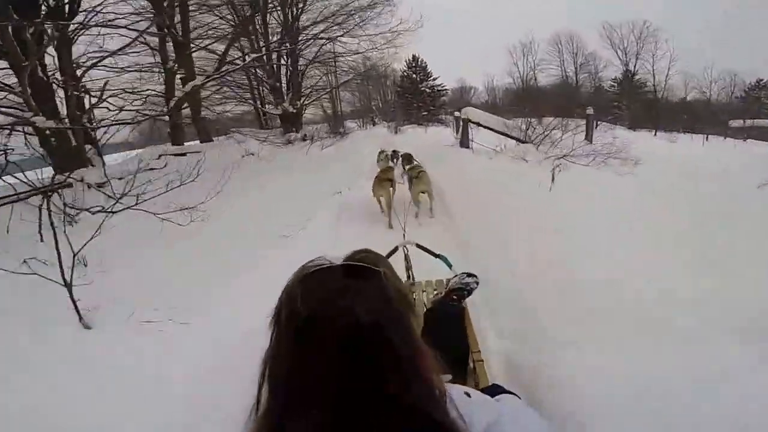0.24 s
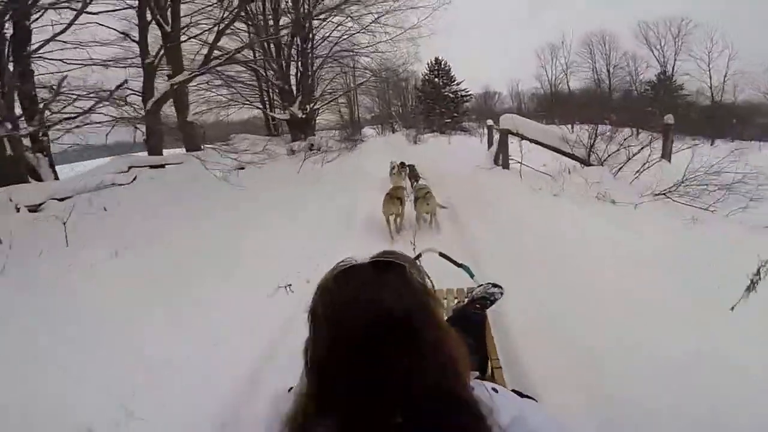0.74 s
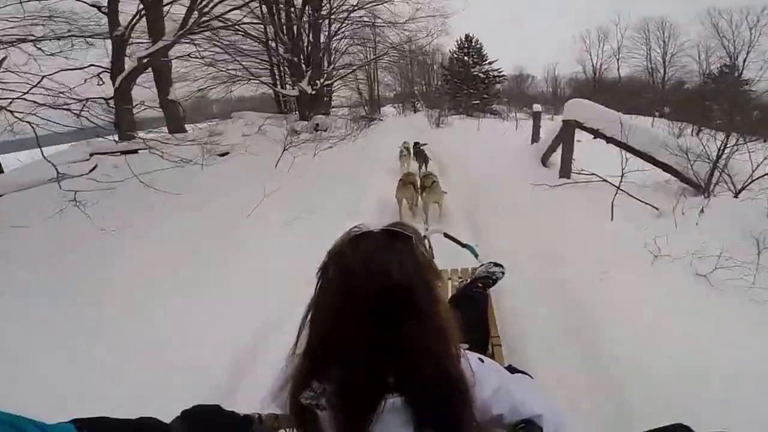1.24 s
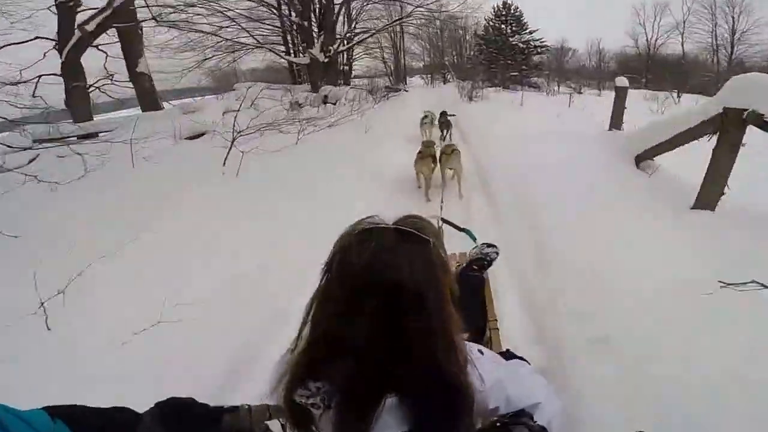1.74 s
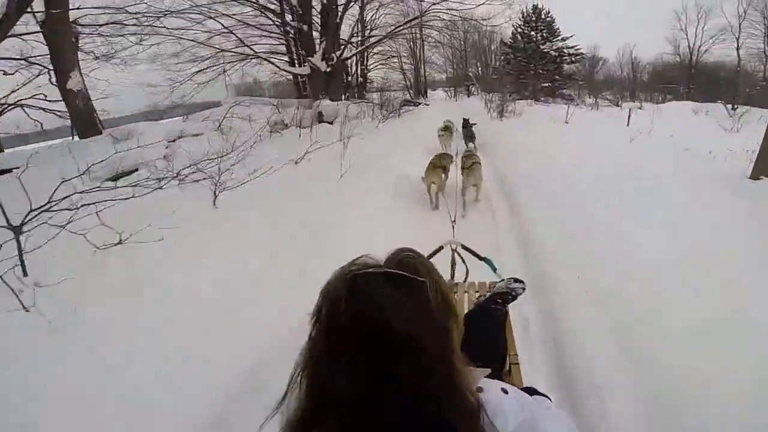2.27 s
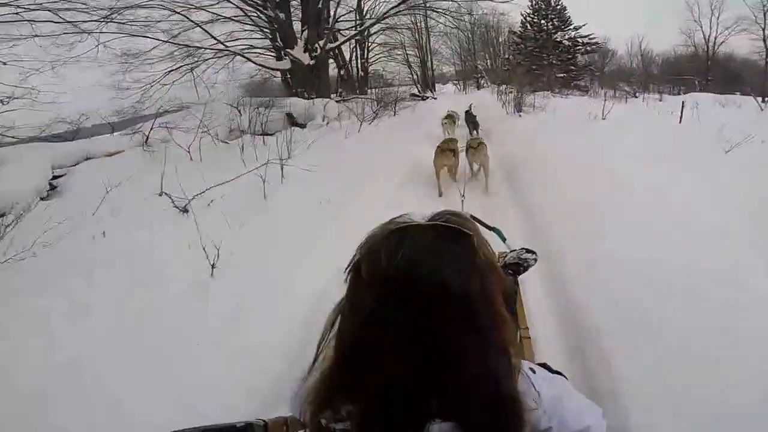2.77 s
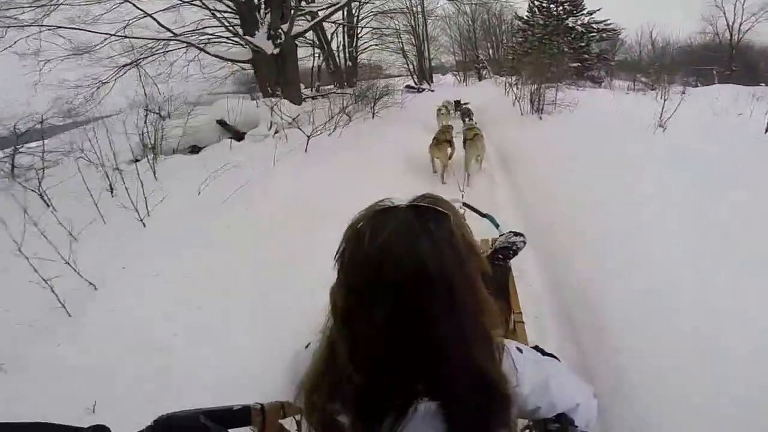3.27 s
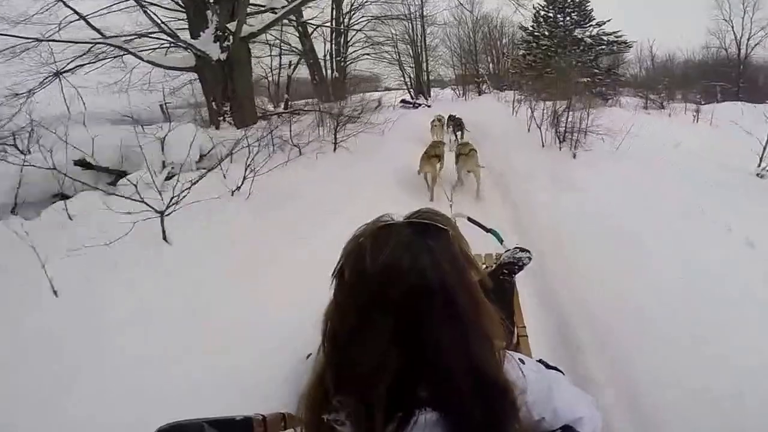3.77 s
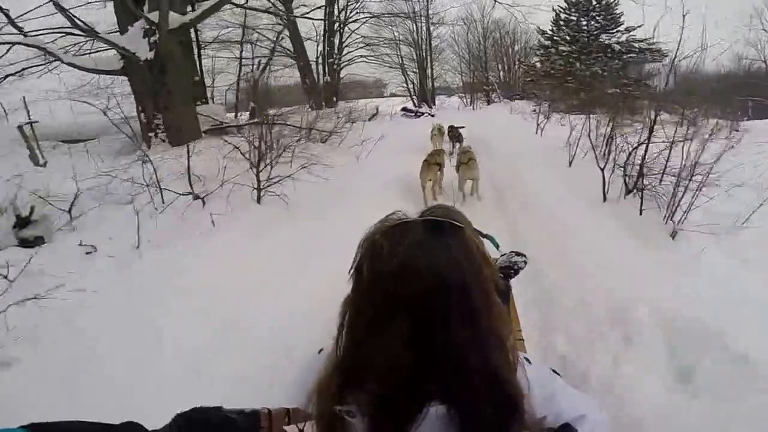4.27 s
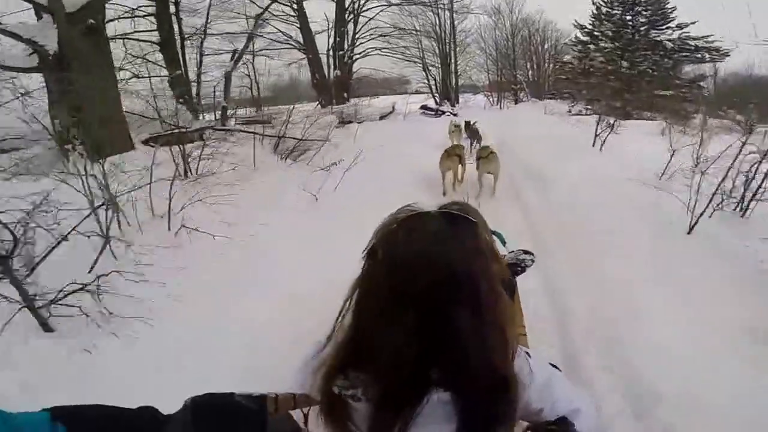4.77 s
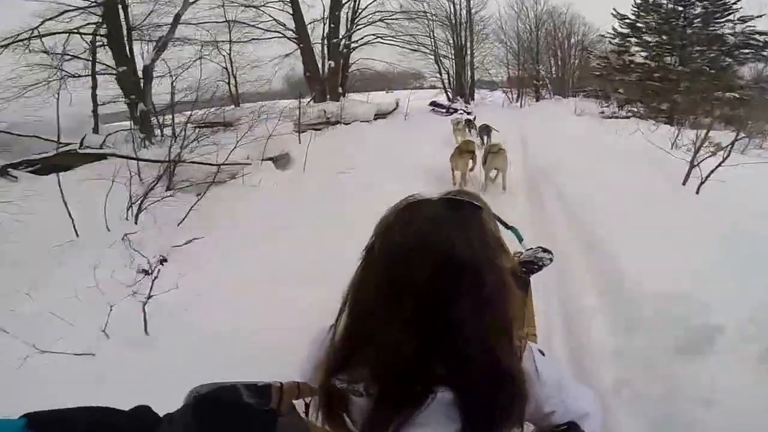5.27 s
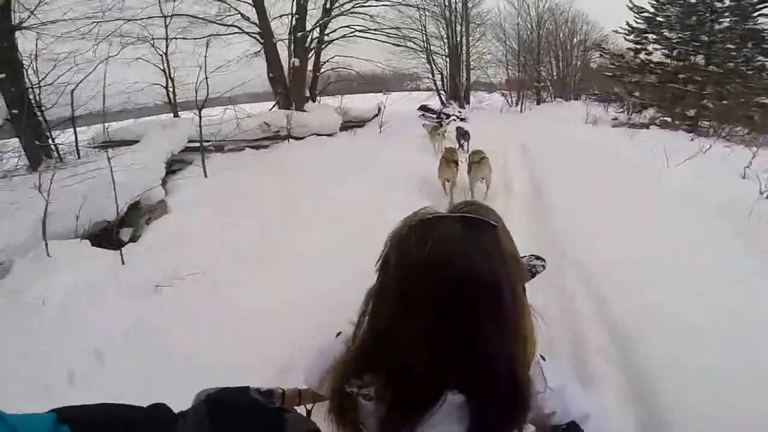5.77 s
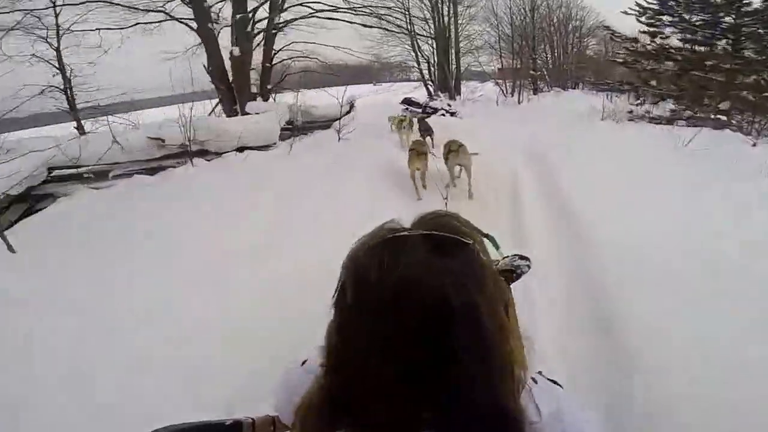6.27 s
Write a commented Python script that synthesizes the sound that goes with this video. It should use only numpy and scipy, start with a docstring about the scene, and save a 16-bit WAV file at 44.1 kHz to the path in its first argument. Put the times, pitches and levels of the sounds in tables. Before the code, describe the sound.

A sled moves steadily over packed snow for about six and a half seconds, heard close and slightly boxy through a small camera case, in open air without echo. Grainy hiss, icy ticking and low rumble run throughout. From 0.5 to 2.6 s the runners bite in short gritty scrapes, strongest around 1 to 1.4 s; afterwards the glide is lighter, with scrapes returning near 6 to 6.4 s. Crust snaps sharply around 0.8 to 1.0, 2.1, 4.1 to 4.3 and 5.1 to 5.5 s. Deep soft jolts land about every half second. Damped wooden knocks come near 0.3, 0.8, 1.1 to 1.3, 2.4, 4.0, 4.3 to 4.6, 5.7 and 6.3 s. Tiny metal clinks appear around 2.8 to 3.9 s, brief snow squeaks at 2.9 s and mostly after 5.2 s. Low wind puffs swell near 2 and 5.5 s, over very faint electronic hiss and thin buzz.

```python
"""Dog sled on a snowy trail

A sled ride heard from a small cased camera worn by the driver. Filtered grains of noise make the runners'
scrape, hiss and rumble; bursts of noise and rings make crunches and crackle; chirps make squeaks and clinks rattle.
Low swept sines jolt the ride about twice a second and knock the frame. Wind is low noise in uneven puffs.
The case's resonances colour most of the snow, wood and wind; the electronics hiss and buzz very faintly.
"""
import sys
import numpy as np
from scipy import signal
from scipy.fft import rfft, irfft, next_fast_len
from scipy.io import wavfile
from scipy.ndimage import uniform_filter1d

SR = 44100
rng = np.random.default_rng(int(sys.argv[2]) if len(sys.argv) > 2 else 0)


def store_pcm(level_fs):
    """Save levels as 16-bit WAV."""
    pcm = np.round(np.clip(level_fs, -1, 1) * 32767).astype(np.int16)
    wavfile.write(sys.argv[1], SR, np.atleast_2d(pcm).T)


N = 287487
TIME = np.arange(N) / SR

# Runners biting into packed snow. Each row: start in seconds, length in seconds, scrape level in dB
# before the takeover from the hiss, sag over the length in dB, rumble level in dB.
RUNNER_BITES = [(0.471, 0.16, -44.5, 9, -47.5), (0.933, 0.078, -49, -0.5, -47),
                (1.015, 0.15, -43, 8.5, -40.5), (1.257, 0.039, -43, -0.5, -43),
                (1.329, 0.096, -44.5, 8, -38), (1.408, 0.23, -49.5, 6, -51), (1.807, 0.11, -50.5, -1, -50),
                (1.868, 0.17, -44.5, 0, -44.5), (2.358, 0.047, -49, -0.5, -45.5),
                (2.407, 0.17, -44, 3, -43), (3.374, 0.06, -53, 2, -67), (5.083, 0.12, -51.5, 1, -58),
                (6.032, 0.093, -45, 12, -50), (6.255, 0.045, -49, 0.5, -52), (6.356, 0.21, -53, -1.5, -53)]
BITE_ATTACK_S, BITE_RELEASE_S = 0.032, 0.037
# Light, steady scrape between bites. Each row: time in seconds, level in dB before the takeover.
LIGHT_SCRAPE_LEVEL = [(0, -57), (0.8, -55.5), (1.6, -56), (1.77, -58), (2.2, -55.5), (2.32, -58.5),
                      (2.7, -56), (3.75, -58), (3.96, -55), (4.2, -59.5), (4.58, -53.5), (4.94, -60.5),
                      (5.05, -54), (5.3, -60.5), (5.65, -56.5), (5.82, -59.5), (6.0, -52.5), (6.52, -55)]
# Loose, icy snow. Each row: time in seconds, reference level in dB that hiss and crackle are offset from.
LOOSE_SNOW_LEVEL = [(0, -56.5), (0.2, -57), (0.4, -59), (0.75, -56.5), (0.96, -55), (1.15, -56.5),
                    (1.55, -54.5), (1.77, -60), (1.93, -53.5), (2.35, -58), (2.8, -59), (3.8, -60.5),
                    (4.22, -57.5), (4.95, -59), (5.2, -57.5), (5.5, -58.5), (5.8, -61), (6.52, -55.5)]
# The trail's rumble in the frame. Each row: time in seconds, level in dB.
TRAIL_RUMBLE_LEVEL = [(0, -55), (0.7, -53), (0.9, -47), (1.25, -55.5), (1.75, -54.5), (2.3, -56),
                      (2.68, -53), (3.0, -54.5), (3.4, -52.5), (3.72, -59.5), (4.02, -51), (4.5, -57.5),
                      (5.02, -52.5), (5.42, -52), (5.75, -55.5), (6.2, -50), (6.52, -51)]
# Resonances of the runners. Each row: pitch in Hz, quality factor, gain in dB.
RUNNER_RESONANCES = [(1136, 8.4, -5), (1360, 5.9, -10.5), (1700, 12, -10.5), (2256, 30, 3)]

# Larger pieces of crust breaking. Each row: time of the snap in seconds, peak level in dB, ring-out in seconds,
# ring pitch in Hz, relative crispness in dB.
CRUST_BREAKS = [(0.03, -41.5, 0.024, 1580, -12), (0.108, -38.5, 0.035, 2910, -26),
                (0.134, -36, 0.033, 2730, -26), (0.288, -36.5, 0.038, 2570, -16),
                (0.342, -37, 0.013, 2570, -15), (0.445, -39.5, 0.027, 2230, -14),
                (0.785, -33.5, 0.048, 2810, -18), (0.799, -38.5, 0.023, 1810, -6),
                (0.841, -40, 0.056, 2690, -23), (0.892, -30, 0.063, 3130, -17),
                (1.035, -32, 0.046, 1410, -42), (2.14, -32, 0.027, 2660, -18),
                (2.226, -39, 0.033, 2660, -17), (2.955, -42.5, 0.03, 3490, -23),
                (3.828, -37.5, 0.022, 2240, -9), (4.034, -42.5, 0.027, 2010, -3),
                (4.104, -43.5, 0.09, 4440, -16), (4.12, -38, 0.027, 2290, -12),
                (4.185, -35.5, 0.047, 2750, -15), (4.288, -38, 0.04, 2060, -13),
                (4.318, -38.5, 0.019, 2800, -12), (4.717, -38.5, 0.033, 2900, -19),
                (4.741, -37, 0.028, 2870, -15), (4.872, -38.5, 0.018, 2340, -7.5),
                (5.181, -36, 0.06, 2920, -18), (5.198, -32, 0.03, 3020, -18),
                (5.255, -38, 0.043, 2980, -31), (5.349, -40, 0.025, 2220, -10),
                (5.484, -41, 0.15, 3600, -24), (5.502, -41, 0.058, 2800, -20),
                (5.541, -35, 0.07, 3050, -35), (5.91, -38, 0.027, 2360, -41), (6.244, -40, 0.018, 2700, -4),
                (6.365, -34, 0.021, 2780, -32)]
# Stretches where small pieces break at random. Each row: start in seconds, end in seconds,
# middle of the peak levels in dB.
CRUSTY_STRETCHES = [(0.117, 0.258, -41.5), (0.861, 1.0, -41), (4.101, 4.3, -43.5), (5.101, 5.55, -43)]
CRUMBS_PER_S, CRUMB_SCATTER_DB, CRUMB_T60_S = 34, 3, 0.038
CRUMB_CENTRE_HZ, CRUMB_CRISP_DB = 3120, -21
# Cold snow squeaking under the runners. Each row: start in seconds, relative level in dB,
# middle pitch in Hz, length in seconds.
SNOW_SQUEAKS = [(2.949, -40, 3540, 0.019), (4.263, -46, 6050, 0.026), (5.243, -38, 3280, 0.022),
                (5.413, -43, 3600, 0.042), (5.432, -37, 3700, 0.12), (5.49, -38, 4600, 0.034),
                (6.352, -34, 2880, 0.019)]

# Bounces of the ride. Each row: start in seconds, peak level in dB, pitch in Hz that the swing settles to.
RIDE_JOLTS = [(0.021, -31, 35.6), (0.504, -27.5, 33.5), (1.083, -30.5, 76), (1.525, -29.5, 32),
              (1.999, -30, 102.4), (2.553, -28.5, 33), (3.07, -28, 34.5), (3.581, -32, 45.6),
              (4.102, -33, 66), (4.619, -28.5, 66), (5.137, -28, 41), (5.654, -28.5, 34.4),
              (5.894, -34.5, 35.0), (6.17, -27.5, 33.6)]
# Knocks of the wooden frame. Each row: start in seconds, thud peak level in dB, nominal thud pitch in Hz,
# relative clack level in dB, clack pitch in Hz.
FRAME_KNOCKS = [(0.294, -37.5, 171, -13, 1430), (0.765, -38, 139, -14, 694), (1.141, -30.5, 148, -15, 1170),
                (1.328, -30, 142, -10, 633), (1.343, -38, 139, -8, 1440), (1.743, -43.5, 146, -2, 694),
                (2.367, -32.5, 143, -26, 1470), (3.982, -36, 145, -4.5, 1230), (3.995, -34, 146, -11, 790),
                (4.331, -27.5, 138, -22, 1290), (4.372, -33.5, 139, -14, 1370), (4.6, -31, 131, -30, 1430),
                (5.692, -30.5, 150, -9.5, 1130), (6.335, -36, 154, -15, 1500)]
# Tiny clinks of a harness snap. Each row: start in seconds, peak level in dB.
HARNESS_CLINKS = [(2.811, -55), (3.433, -50), (3.518, -50), (3.854, -57)]
# Resonances of that snap. Each row: pitch in Hz, relative level in dB.
SNAP_RESONANCES = [(5900, 3), (12500, -5)]

# Air on the case. Each row: time in seconds, level in dB around which it sways.
WIND_LEVEL = [(0, -46.5), (0.9, -46.5), (2.05, -42.5), (2.9, -48), (3.8, -49), (4.4, -47.5), (4.8, -45.5),
              (5.5, -41.5), (5.95, -47.5), (6.52, -43.5)]
# Slow unevenness, then the puff after each jolt: dB against the jolt, and its delay and half length.
WIND_SWAY_DB, PUFF_DB, PUFF_S = 2, -14, 0.038

# Spectra of the layers before the case colours them. Each row: frequency in Hz, relative level in dB.
SCRAPE_SPECTRUM = [(300, -10), (700, -13), (900, -9), (1100, -2.5), (1600, -1), (2400, 1), (3000, -7),
                   (4000, -11.5), (6500, -18), (10000, -26.5), (15000, -40)]
HISS_SPECTRUM = [(200, -5.5), (450, -1.5), (800, -6), (1400, -6.5), (2400, -3), (3400, -5), (4500, -11),
                 (6200, -11), (8000, -15), (10500, -22.5), (12000, -29), (15000, -50)]
RUMBLE_SPECTRUM = [(40, -17), (95, 2.5), (140, 0.5), (250, -6.5), (350, -11), (480, -21.5), (800, -31),
                   (2000, -80), (8000, -100)]
CRUST_SPECTRUM = [(200, 4.5), (1000, -14.5), (1350, 2), (2900, 4.5), (4500, -4.5), (6200, -7.5),
                  (8000, -18), (11000, -27.5), (15000, -79)]
CLACK_SPECTRUM = [(200, 4), (500, -7), (800, -16), (1200, 0), (1900, -7), (3200, -6), (8000, -64)]
WIND_SPECTRUM = [(8, -8), (20, 1.5), (32, 4), (55, -4.5), (100, -13.5), (180, -23.5), (400, -81),
                 (3000, -110)]

# Resonances and notches of the camera case. Each row: centre in Hz, width in Hz, gain in dB.
CASE_RESONANCES = [(1195, 220, -2.5), (1690, 540, 1), (2220, 450, -1.5), (2115, 34, 2.5), (3640, 580, 2),
                   (3920, 360, -6), (4540, 380, 3), (5145, 210, -9.5), (5500, 470, 1.5), (6710, 550, -4.5),
                   (6980, 460, 0), (8170, 1340, -4.5)]
# Long bursts of the electronics' buzz. Each row: start in seconds, end in seconds.
BUZZ_BURSTS = [(0, .19), (2.0, 2.28), (4.18, 4.48), (6.29, 6.52)]
# Tones of the buzz. Each row: frequency in Hz, relative level in dB.
BUZZ_TONES = [(9360, 0), (9920, -5), (10070, 0), (10350, -6), (10630, -1), (10950, -6)]
TOP_HZ = 15250


def undb(db):
    """Decibels to gain."""
    return 10 ** (np.asarray(db) / 20)


def unit(x):
    """Scale to rms 1."""
    return x / np.sqrt(np.mean(x ** 2))


def curve(table, axis):
    """One column of a table, joined by straight lines in time."""
    rows = np.array(table)
    return np.interp(TIME, rows[:, 0], rows[:, axis])


def colour(x, points):
    """Minimum-phase filter: a drawn spectrum plus the case's resonances, with no sound ahead of its cause."""
    size = next_fast_len(len(x) + 4096)
    size += size % 2
    hz = np.arange(size // 2 + 1) * SR / size
    rows = np.array(points)
    db = np.interp(np.log(hz + 1), np.log(rows[:, 0]), rows[:, 1])
    for centre, width, gain in CASE_RESONANCES:
        db = db + gain * np.exp(-2 * ((hz - centre) / width) ** 2)
    # folding the cepstrum onto positive time makes the filter causal
    cepstrum = irfft(np.log(undb(db)))
    cepstrum[1:size // 2] *= 2
    cepstrum[size // 2 + 1:] = 0
    response = np.exp(rfft(cepstrum))
    return irfft(rfft(x, size) * response)[:len(x)]


def walk(rate):
    """Slow chance: random levels, `rate` a second, joined by straight lines and scaled to rms 1."""
    knots = rng.standard_normal(4096)
    return unit(np.interp(TIME * rate, np.arange(len(knots)), knots))


def grains(rate, spread_db):
    """Snow crystals snapping: random clicks, about `rate` a second, of uneven size."""
    size = undb(spread_db * np.minimum(rng.exponential(size=N), 5))
    clicks = rng.random(N) < rate / SR
    return unit(clicks * rng.choice([-1, 1], N) * size)


def fade(t, rise, t60):
    """A soft attack and an exponential decay that falls 60 dB in t60 seconds."""
    return (1 - np.exp(-t / rise)) * np.exp(-np.log(1000) * t / t60)


def ring(x, hz, q):
    """One damped resonance."""
    return signal.lfilter(*signal.iirpeak(hz, max(q, 1), fs=SR), x)


def sweep(pitch):
    """A sine that follows a moving pitch in Hz."""
    return np.sin(2 * np.pi * np.cumsum(pitch) / SR)


def add(out, start, sound, db):
    """Mix in a sound with its peak at the given level."""
    i = max(int(start * SR), 0)
    part = sound[:N - i]
    out[i:i + len(part)] += undb(db) * part / np.abs(sound).max()


def runners():
    """Packed snow shears in gritty grains that ring the runners; loose snow hisses; the trail rumbles the frame."""
    shear = colour(grains(rate=3500, spread_db=2.2), SCRAPE_SPECTRUM)
    shear = shear + sum(undb(db) * ring(shear, hz, q) for hz, q, db in RUNNER_RESONANCES)
    scrape = unit(shear) * undb(1.06 * walk(rate=100) + 1.57 * walk(rate=20))

    hiss = unit(colour(grains(rate=9000, spread_db=1.5), HISS_SPECTRUM))
    hiss = hiss * undb(1.0 * walk(rate=41) + 1.6 * walk(rate=16))

    rumble = unit(colour(grains(rate=400, spread_db=1.5), RUMBLE_SPECTRUM))
    rumble = rumble * undb(0.61 * walk(rate=67) + 2.1 * walk(rate=8.8))

    bite_scrape, bite_rumble = bites()
    scrape_gain = np.hypot(bite_scrape, undb(curve(LIGHT_SCRAPE_LEVEL, axis=1)))
    rumble_gain = np.hypot(bite_rumble, undb(curve(TRAIL_RUMBLE_LEVEL, axis=1)))
    # the scrape takes over from the hiss when the runners bite
    takeover = 1 / (1 + np.exp(-(20 * np.log10(scrape_gain) + 59) / 3.1))
    hiss_db = curve(LOOSE_SNOW_LEVEL, axis=1) + 2 - 3 * takeover
    return scrape * takeover * scrape_gain + hiss * undb(hiss_db) + rumble * rumble_gain


def bites():
    """Gains of scrape and rumble: each bite swells, sags or builds as the snow gives, and lets go."""
    scrape, rumble = np.zeros(N), np.zeros(N)
    for start, length, scrape_db, sag_db, rumble_db in RUNNER_BITES:
        t = TIME - start
        swell = np.clip(t / BITE_ATTACK_S, 0, 1)
        release = np.exp(-np.maximum(t - length, 0) / BITE_RELEASE_S)
        shape = swell * release * undb(-sag_db * np.clip(t / length, 0, 1))
        scrape = np.hypot(scrape, shape * undb(scrape_db))
        rumble = np.hypot(rumble, shape * undb(rumble_db))
    return scrape, rumble


def crackle():
    """Small ice crumbs tick on the sled, each size ringing at its own pitch, louder with the loose snow."""
    ticks = 0
    for hz in np.geomspace(1400, 7500, num=12):
        ticks = ticks + unit(ring(grains(rate=22, spread_db=-2.0), hz, q=17))
    return unit(colour(ticks, CRUST_SPECTRUM)) * undb(curve(LOOSE_SNOW_LEVEL, axis=1) - 5.0)


def crunches():
    """Each piece of crust strains, snaps, and crumbles in a cluster of cracks that rings at its own pitch."""
    out, t = np.zeros(N), TIME[:SR // 8]
    lead = .012  # seconds of straining ahead of the listed time
    since = t - lead - .0015
    strain = np.exp(np.minimum(since, 0) / 0.0021)
    highpass = signal.butter(2, 4500, "high", fs=SR, output="sos")
    for start, db, t60, hz, crisp_db in CRUST_BREAKS + crumbs():
        release = np.exp(-np.log(1000) * np.maximum(since, 0) / max(t60, .005))
        grit = rng.standard_normal(len(t)) * rng.exponential(size=len(t)) ** .5
        cracks = colour(grit * strain * release, CRUST_SPECTRUM)
        body = 1.33 * unit(cracks) + 0.54 * unit(ring(cracks, hz, q=11.0))
        edge = undb(crisp_db + 10) * unit(signal.sosfilt(highpass, cracks))
        add(out, start - lead, body + edge, db)
    return out


def crumbs():
    """Small pieces break at random moments along the crusty stretches, each with its own strength and pitch."""
    rows = []
    for start, end, db in CRUSTY_STRETCHES:
        chance = rng.uniform(-1, 1, size=(64, 3))
        for place, strength, pitch in chance[:int((end - start) * CRUMBS_PER_S)]:
            moment = start + .5 * (1 + place) * (end - start)
            peak_db = db + CRUMB_SCATTER_DB * strength
            hz = CRUMB_CENTRE_HZ * 2 ** (0.35 * pitch)
            rows.append((moment, peak_db, CRUMB_T60_S, hz, CRUMB_CRISP_DB))
    return rows


def squeaks():
    """Crystals stick and slip for a moment in a rough, wavering chirp."""
    out = np.zeros(N)
    for start, db, hz, length in SNOW_SQUEAKS:
        size = int(length * SR)
        pitch = hz * (1 + 0.049 * walk(rate=1100)[:size])
        roughness = undb(5.2 * walk(rate=500)[:size])
        add(out, start, sweep(pitch) * np.hanning(size) * roughness, db - 8)
    return out


def jolts():
    """Each bounce shoves the camera sharply, then it swings on more slowly for a few low cycles."""
    out, t = np.zeros(N), TIME[:SR // 4]
    for start, db, hz in RIDE_JOLTS:
        pitch = hz + 55 * np.exp(-t / 0.0048)
        add(out, start, sweep(pitch) * fade(t, rise=0.0027, t60=0.15), db)
    return out


def knocks():
    """The lashed frame takes a bump: a heavily damped thud, a hollow body note and a dry wooden clack."""
    out, t = np.zeros(N), TIME[:SR // 8]
    for start, db, hz, clack_db, clack_hz in FRAME_KNOCKS:
        # the pitch sags as the lashings give
        pitch = hz * (0.64 + 0.9 * np.exp(-t / 0.0058))
        push = fade(t, rise=0.0043, t60=0.039) ** 2
        add(out, start, sweep(pitch) * push, db)
        clack = colour(rng.standard_normal(len(t)) * fade(t, rise=0.0017, t60=0.051), CLACK_SPECTRUM)
        note = unit(ring(clack, clack_hz, q=4))
        hollow = unit(ring(clack, hz=410, q=2.5))
        add(out, start, 1.3 * unit(clack) + note + hollow, db + clack_db + 2.5)
    return out


def clinks():
    """A small metal snap on the harness rattles briefly: a noise burst rings its resonances."""
    out, t = np.zeros(N), TIME[:SR // 10]
    for start, db in HARNESS_CLINKS:
        rattle = rng.standard_normal(len(t)) * fade(t, rise=.004, t60=0.025)
        metal = sum(undb(mode_db) * unit(ring(rattle, hz, q=18)) for hz, mode_db in SNAP_RESONANCES)
        add(out, start, metal, db)
    return out


def wind():
    """Eddies press on the case in low, uneven puffs, harder whenever a jolt throws the camera forward."""
    eddies = unit(colour(rng.standard_normal(N), WIND_SPECTRUM))
    puffs = np.zeros(N)
    for start, db, _ in RIDE_JOLTS:
        puffs += undb(db + PUFF_DB) * np.exp(-.5 * ((TIME - start - PUFF_S) / PUFF_S) ** 2)
    steady = undb(curve(WIND_LEVEL, axis=1) + WIND_SWAY_DB * walk(rate=14))
    return eddies * np.hypot(steady, puffs)


def electronics():
    """Faint circuit hiss; a thin buzz pulses about seven times a second, with long holds ending in a tiny whistle."""
    gate = .8 * ((TIME - .06) % .137 < .035)
    whistle_gate = np.zeros(N)
    for start, end in BUZZ_BURSTS:
        gate[(TIME > start) & (TIME < end)] = 1
        whistle_gate += (TIME > end) & (TIME < end + .04)
    # wandering phases roughen the tones
    buzz = sum(undb(db) * np.sin(2 * np.pi * hz * TIME + 1.4 * walk(rate=350)) for hz, db in BUZZ_TONES)
    tone = np.sin(2 * np.pi * 10230 * TIME + .5 * walk(rate=300))
    # short averages soften the switching
    whine = undb(-73.5) * unit(buzz) * uniform_filter1d(gate, size=200)
    whine += undb(-64.5) * tone * uniform_filter1d(whistle_gate, size=200)
    return whine + undb(-78.5) * rng.standard_normal(N)


def scene():
    """Everything reaches one microphone; open snow gives no echo."""
    snow = runners() + crackle() + crunches() + squeaks()
    sled = jolts() + knocks() + clinks()
    return (snow + sled + wind() + electronics())[None]


def record(dry):
    """The camera cuts the top with a steep low-pass."""
    return signal.sosfilt(signal.ellip(10, .1, 70, TOP_HZ, fs=SR, output="sos"), dry)


dry = scene()
out = record(dry)
store_pcm(out)
```